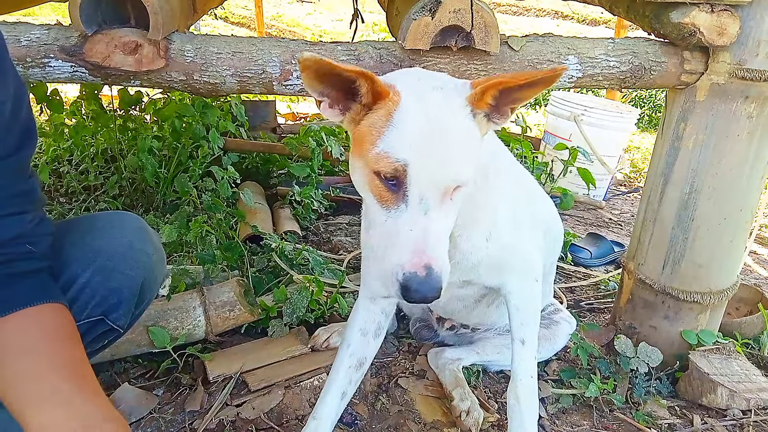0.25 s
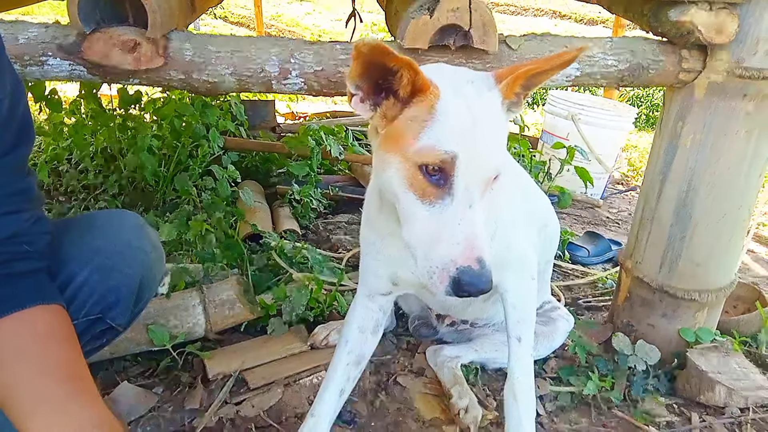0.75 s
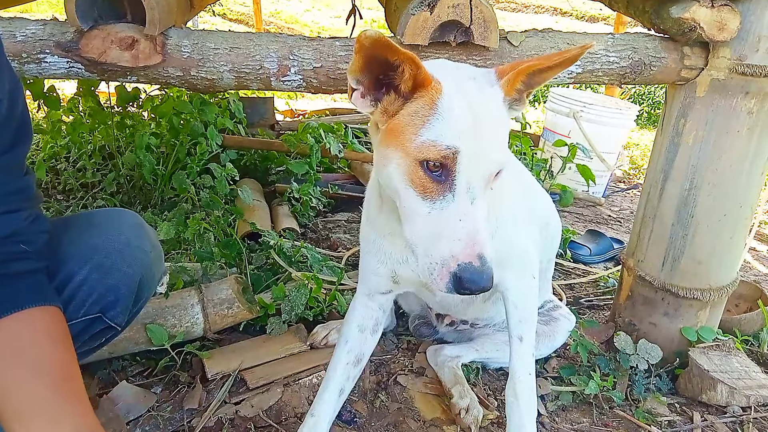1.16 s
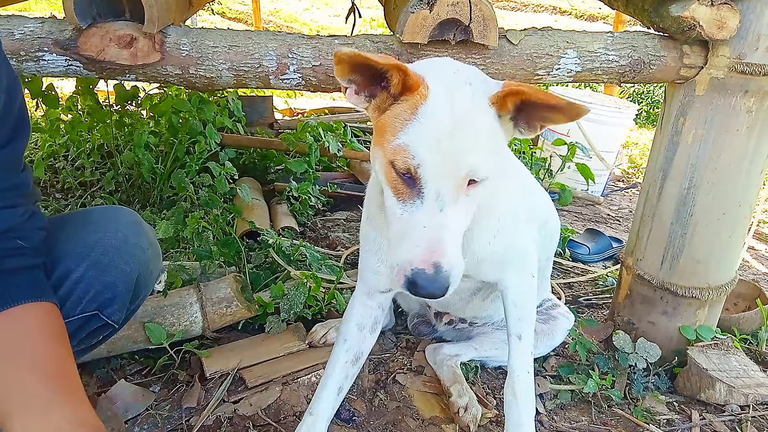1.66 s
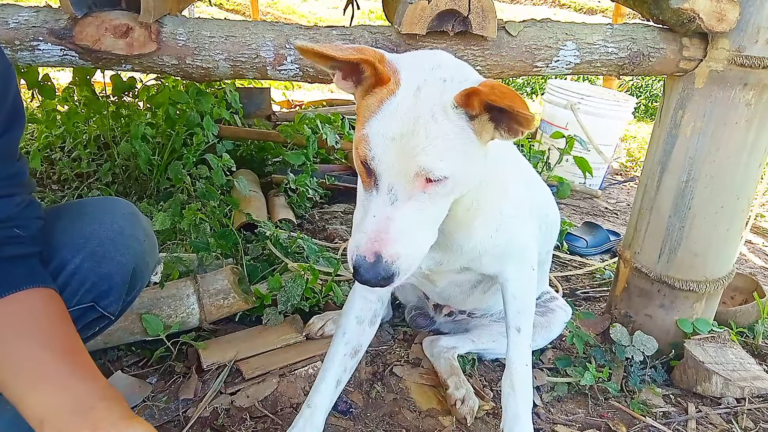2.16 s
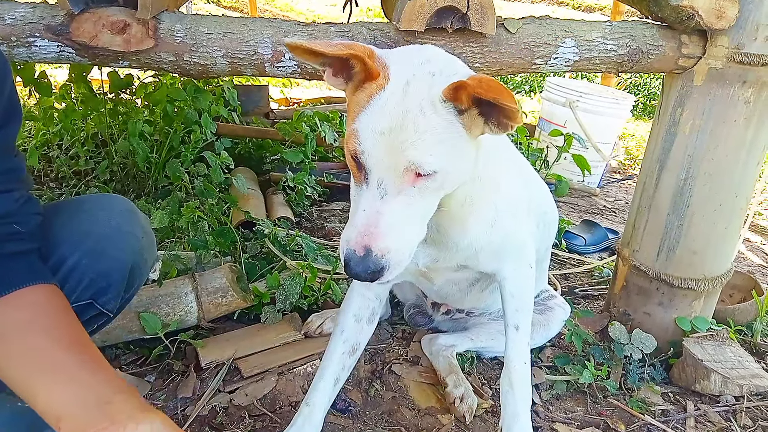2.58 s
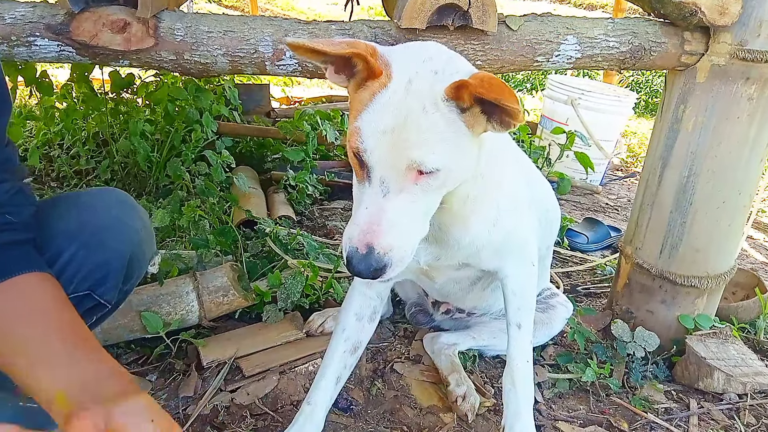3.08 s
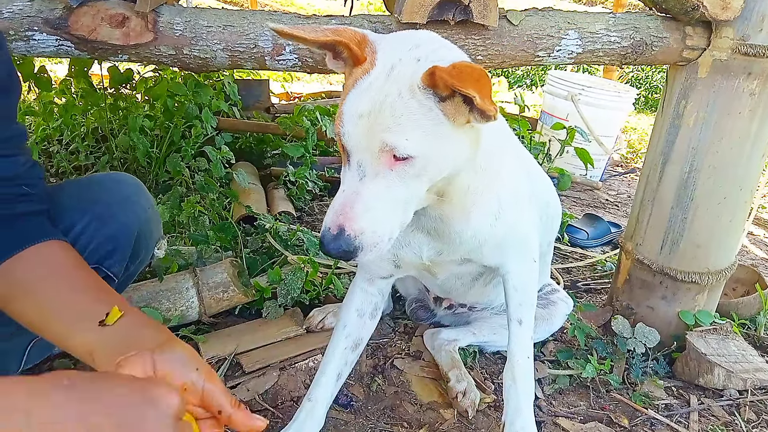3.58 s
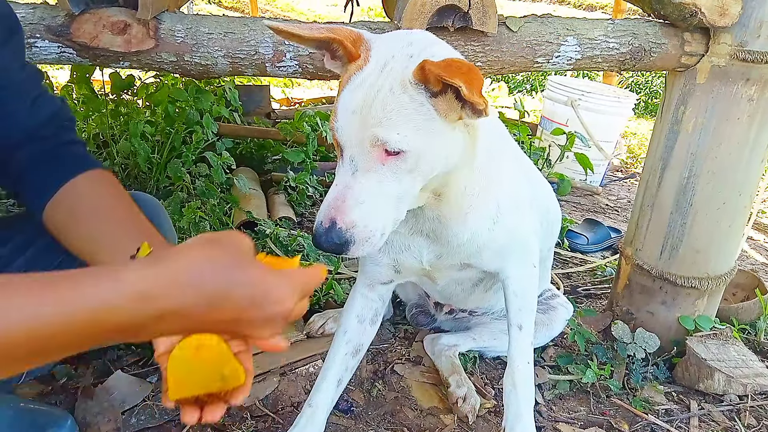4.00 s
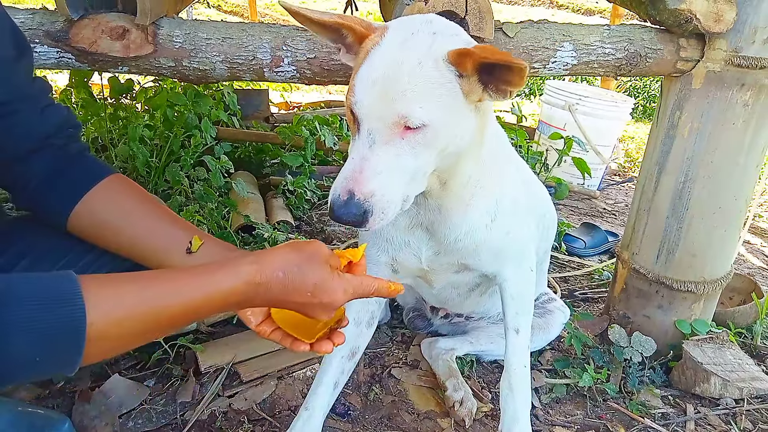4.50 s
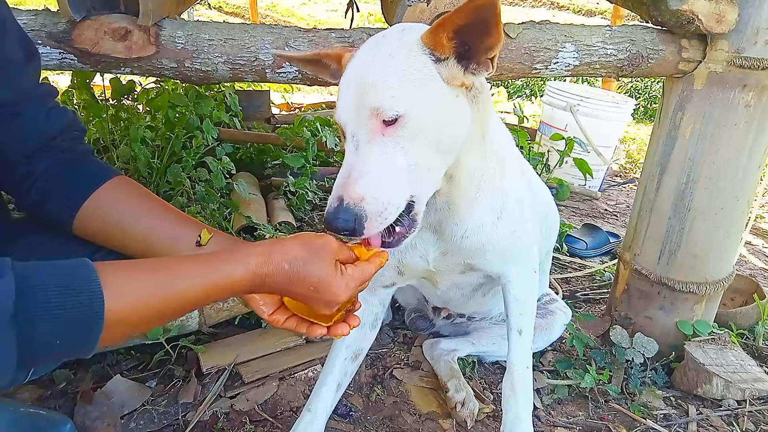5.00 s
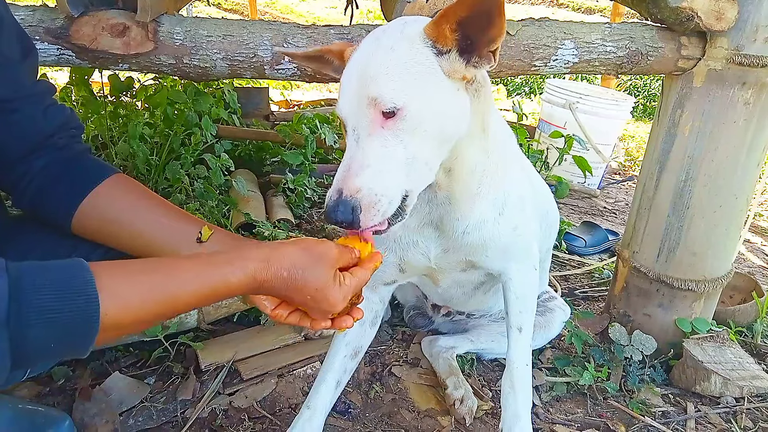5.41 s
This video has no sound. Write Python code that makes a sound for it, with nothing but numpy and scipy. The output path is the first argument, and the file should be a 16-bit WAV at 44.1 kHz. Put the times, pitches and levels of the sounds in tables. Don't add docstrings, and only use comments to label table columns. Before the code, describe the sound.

In a quiet outdoor yard, a dog close to a small handheld microphone makes faint wet lip pops. A small bird pipes three thin rising notes, then fruit beside the microphone is cut with a sharp knock, a loud crisp snap and short grainy tears. Sparse licks follow and a brief high twitter near the end, over insects, far fowl and airy leaf hiss.

```python
import sys
import numpy as np
from scipy import signal
from scipy.fft import rfft, irfft
from scipy.io import wavfile
from scipy.ndimage import uniform_filter1d

SR = 44100
rng = np.random.default_rng(int(sys.argv[2]) if len(sys.argv) > 2 else 0)


def volts_from_decibels(level):
    exponent = np.asarray(level, float) / 20
    return 10 ** exponent


def digitize_waveform(pressure):
    field = np.atleast_2d(pressure).T
    bounded = np.clip(field, -1, 1)
    quanta = np.round(bounded * 32767).astype(np.int16)
    wavfile.write(sys.argv[1], SR, quanta)


N = 249165
TIME = np.arange(N) / SR
FREQ = np.maximum(np.fft.rfftfreq(N, 1 / SR), 1)

# (time [s], peak level [dB], cavity pitch [Hz], ring t60 [s], release click level [dB])
MOUTH_POPS = [(0.833, -52.5, 4840, 0.077, -5), (1.054, -56, 1990, 0.051, -7),
              (1.144, -51, 2950, 0.089, -12), (1.1675, -43.5, 1950, 0.025, 1),
              (1.289, -56, 4360, 0.035, -10), (1.798, -47.5, 1200, 0.03, -9), (1.824, -52, 3870, 0.039, 0),
              (1.873, -47, 737, 0.11, -15), (1.884, -45, 656, 0.088, -2), (2.246, -44.5, 695, 0.047, -15),
              (2.376, -35, 824, 0.009, -24), (3.686, -48.5, 4260, 0.023, -1),
              (4.6905, -37.5, 754, 0.046, -26), (4.79, -49, 3800, 0.033, -17),
              (5.611, -41, 1010, 0.023, -18),
              (0.839, -55, 4300, .04, -6), (1.283, -59, 2560, 0.09, -20), (1.36, -57, 2400, .06, -20),
                (1.205, -59, 2350, 0.09, -20), (1.13, -59, 3000, .05, -20), (1.75, -58, 470, 0.05, -8),
                (1.8, -54, 740, 0.048, -10), (1.69, -51, 670, 0.039, -21), (1.85, -52, 390, 0.039, -16),
                (1.798, -52, 1770, 0.03, -13), (1.799, -51, 3360, .02, -6), (1.874, -48.5, 2930, 0.053, -8),
                (1.875, -49, 3600, 0.034, -6), (2.385, -49, 880, 0.05, -14), (5.235, -57, 763, 0.059, -12),
                (5.612, -51, 250, 0.075, -6)]
# (time [s], peak level [dB], lower edge [Hz], t60 [s])
THIN_TICKS = [(1.1685, -49, 700, .012), (1.1833, -48, 1200, 0.027), (1.799, -52, 900, .012),
              (1.873, -53, 2500, 0.027), (2.4114, -48, 7050, .01), (2.6307, -24, 3000, 0.0025),
              (2.866, -31, 11000, .006), (2.9857, -30, 3000, 0.015), (2.9268, -37, 11000, .009),
              (2.969, -40.5, 7900, .005), (3.057, -54, 11200, .012), (3.1188, -54, 9000, .012),
              (3.6845, -51, 4000, 0.011), (4.0637, -48, 8000, 0.03), (4.1116, -48, 6900, 0.0087),
              (4.5465, -50, 7000, 0.012), (4.654, -55, 2480, .012), (4.7355, -50, 9100, .01),
              (4.7655, -58, 10000, .01), (5.1617, -53, 8000, 0.0093), (5.26, -54, 4960, .01)]

# (time [s], strength [dB], signed push [ratio])
BLADE_SLIPS = [
    (2.8128, 1.5, 0.98),
    (2.8132, 0, -0.72),
    (2.8140, 1.3, 0.91),
    (2.8155, -17.5, -1.2),
    (2.8163, -1.5, 0.85),
    (2.8177, -20, -0.61),
    (2.9853, -22, 0.8),
    (2.9868, -35, -1.4),
]
# (pitch [Hz], level [dB], t60 [s])
BLADE_MODES = [(938, -20.5, 0.01), (1334, -15.5, 0.02), (1800, -13, 0.01), (2263, -7, 0.024),
               (2256, -23.5, 0.095), (2510, -32, 0.1), (3000, -10, 0.012), (3610, -5.5, 0.025),
               (4650, 0.5, 0.0074), (5170, -5.5, 0.0088), (6700, -6, 0.0022), (8800, -10, 0.0054),
               (11300, -13.5, 0.013), (12250, -10, 0.0038), (15000, -13, 0.012)]
# (frequency [Hz], density [dB per Hz])
FIBRE_COLOUR = [(180, -42), (600, -11), (1560, -1.5), (2250, -8), (2740, -1), (5700, -2.5), (7080, -10),
                (8940, -1.5), (10600, -15), (13300, -12), (16000, -19.5)]
# (time of peak [s], rms level [dB], rise [s], fall t60 [s], bright share [ratio])
FIBRE_TEARS = [(1.877, -58, 0.03, 0.15, -3.3), (2.8141, -31.5, 0.00049, 0.021, 1.5),
               (2.826, -39.5, 0.0091, 0.096, 0.3), (2.893, -48, 0.003, 0.092, 0.6),
               (2.901, -40.5, 0.012, 0.037, 0.97), (2.914, -58.5, 0.0065, 0.11, 2.5),
               (2.95, -66, 0.046, 0.52, 2.5), (2.9862, -32.5, 0.00078, 0.035, -0.35),
               (3.003, -51, 0.0067, 0.077, 0), (3.02, -70, .01, 0.27, 2), (3.129, -74, 0.02, 0.23, 4.5)]
# (time [s], peak level [dB], pitch [Hz], t60 [s])
FRUIT_KNOCKS = [(2.3785, -46.5, 193, 0.037), (2.574, -39, 194, 0.027), (2.6309, -31, 1800, 0.0082),
                (2.6317, -17.5, 1140, 0.0053), (2.632, -31, 336, 0.027), (2.634, -42, 840, 0.017),
                (2.633, -42, 136, 0.075), (2.899, -44, 900, .05), (2.91, -52, 950, .04),
                (2.9, -50, 200, .06), (2.985, -43, 1700, .025), (2.987, -52, 150, .08),
                (5.59, -57.5, 743, 0.36)]
# (time [s], peak level [dB],
# pitch [Hz], t60 [s])
TINY_CRACKS = [(2.6306, -14.5, 4840, 0.0011), (2.631, -19.5, 8670, 0.002), (2.6306, -32, 13000, 0.0027),
               (2.8257, -27, 4800, .008), (2.8282, -37, 2000, .01), (2.8315, -35, 2000, .01),
               (2.835, -40, 2250, 0.021), (2.851, -42, 2100, .012), (2.853, -45, 2000, .01),
               (3.0575, -48, 14300, .005), (2.928, -46, 13000, .008), (3.132, -48, 8640, .015),
               (3.1195, -49, 13000, .005), (2.861, -48, 12000, .005), (2.883, -32, 13500, .005),
               (2.892, -40, 2900, 0.011), (2.894, -38, 4600, .006), (2.8968, -28.5, 2760, 0.0056),
               (2.8987, -26, 12800, .004), (2.901, -29, 5450, 0.0058), (2.9016, -33, 4660, .007),
               (2.902, -26.5, 3690, 0.0095), (2.9113, -42, 3700, 0.0047), (2.916, -43, 8850, 0.0053),
               (2.953, -50, 13500, .005), (2.983, -43, 3900, 0.01), (2.9847, -31, 12100, .007),
               (2.9851, -26, 4120, 0.0068), (2.9862, -33.5, 3860, 0.015), (2.986, -31, 5560, 0.012),
               (3.0005, -45, 5300, .01), (3.035, -52, 12000, .005), (3.046, -49, 13500, .006),
               (3.081, -56, 13000, .005), (3.127, -49, 10500, .006), (1.1688, -47, 3580, .008),
               (1.8744, -48, 3300, .02), (1.8775, -51, 3480, .015), (1.1692, -50, 5200, .005),
               (1.1847, -48, 3000, .006), (1.1846, -48, 5600, .006), (2.6305, -34, 3170, 0.0038),
               (4.6535, -49, 3400, .005), (4.654, -46, 5700, 0.0056), (4.7535, -48, 6500, .006),
               (4.754, -54, 4300, .008), (4.754, -50, 8400, .006), (.836, -58, 3570, 0.009)]

# (time [s], length [s], start pitch [Hz], level [dB], climb time [s])
PIPED_NOTES = [
    (2.212, 0.155, 7450, -55.5, 0.029),
    (2.455, 0.18, 6900, -53.5, 0.042),
    (2.735, 0.155, 7850, -55, 0.055),
]
# (time [s], length [s], start pitch [Hz], end pitch [Hz], level [dB])
TWITTER_NOTES = [(0.64, 0.035, 8750, 8600, -60), (.675, .03, 8000, 7750, -63),
                 (0.688, 0.03, 8650, 8600, -58), (.71, .025, 7650, 7450, -63), (.74, 0.04, 8750, 7700, -60),
                 (.765, .02, 8750, 8650, -60), (5.398, 0.025, 8800, 8500, -59),
                 (5.42, .06, 8300, 7550, -64), (5.44, .03, 8500, 8300, -65), (5.5, 0.03, 8450, 8000, -62),
                 (5.53, 0.035, 7900, 8200, -62), (5.565, .03, 8000, 7950, -64)]
PIPE_WOBBLE, TREMBLE_DB = .007, 3.4

# (time [s], length [s], start pitch [Hz], glide [Hz], level [dB])
FOWL_WHISTLES = [(1.86, 0.08, 1473, 34, -72), (2.02, 0.035, 1720, -20, -71), (2.05, 0.045, 2950, -20, -74),
                 (2.09, 0.029, 2980, -10, -74), (2.035, 0.023, 1880, 10, -78), (2.07, 0.045, 1890, 18, -70),
                 (2.13, 0.034, 1900, 0, -75), (2.085, 0.033, 1696, -16, -73), (2.95, 0.053, 1500, 18, -70),
                 (2.185, 0.04, 1530, 40, -70), (2.215, 0.036, 1605, 40, -72), (2.3, 0.08, 1727, 60, -76),
                 (2.41, 0.077, 1850, -65, -68.5), (2.54, 0.068, 1580, -18, -66),
                 (3.33, 0.17, 1500, -55, -76.5), (3.583, 0.17, 1745, 21, -78), (3.72, 0.16, 1622, 19, -79),
                 (3.861, 0.15, 1640, -80, -78), (3.85, 0.15, 1403, -135, -79),
                 (3.92, 0.093, 1950, -60, -84), (4.44, 0.03, 1620, 50, -72), (4.455, .035, 1900, 100, -73),
                 (4.474, .06, 1780, 100, -77), (.27, 0.054, 1990, -20, -76), (.79, .05, 2250, 60, -80),
                 (4.64, 0.058, 2170, 22, -73), (4.605, 0.049, 1750, 170, -62), (4.65, 0.043, 1890, 40, -64),
                 (4.7, 0.016, 1750, 0, -68), (4.905, .045, 1850, -84, -71),
                 (4.748, 0.025, 1790, -32, -69.5), (4.845, 0.043, 1780, 40, -65.5),
                 (4.962, 0.033, 1800, -6, -64), (4.992, 0.024, 1770, -10, -63.5),
                 (5.02, 0.035, 1790, 0, -69), (5.459, 0.048, 2000, -4, -71)]
# (time [s], length [s], pitch [Hz], level [dB])
DOVE_COOS = [(0.299, 0.54, 1885, -81.5), (0.399, 0.13, 781, -79), (3.35, 0.11, 792, -79),
             (0.614, 0.14, 785, -78), (0.618, 0.16, 938, -74.5), (1.33, 0.14, 823, -69.5),
             (1.74, 0.061, 1463, -71), (1.81, .05, 1480, -77), (2.052, 0.18, 945, -82),
             (2.274, 0.05, 958, -71.5), (2.332, 0.056, 970, -73), (2.393, 0.056, 945, -73),
             (2.064, 0.032, 964, -75), (3.032, 0.088, 1730, -72.5), (3.28, 0.033, 960, -70.5),
             (3.35, 0.066, 950, -71), (3.767, 0.056, 788, -71.5), (3.839, 0.056, 790, -67),
             (3.985, 0.035, 763, -73.5), (4.17, 0.029, 696, -71), (3.862, 0.082, 275.5, -76),
             (0.028, 0.15, 960, -79), (0.301, .09, 965, -77), (.97, .07, 795, -79), (4.31, 0.17, 955, -69),
             (4.799, 0.04, 968, -73), (4.871, 0.027, 973, -74), (4.642, .04, 938, -69.5),
             (4.73, 0.02, 950, -75), (4.701, 0.027, 757, -65.5), (5.473, 0.12, 680, -74.5)]
# (pitch [Hz], width [octaves], level [dB])
FAR_CHORUS = [(799, 0.024, -83.5), (945, 0.052, -84.5), (1500, 0.085, -86), (1800, 0.074, -82)]

# (time of peak [s], level [dB], spread [s])
INSECT_SURGES = [
    (0.0, -73, 0.04),
    (.21, -71.5, 0.036),
    (.72, -78, 0.047),
    (1.87, -85, 0.035),
    (3.95, -78.5, 0.12),
    (4.66, -72, 0.074),
    (4.93, -77, 0.027),
    (5.53, -70, 0.063),
]
# (time of peak [s], level [dB], spread [s])
RUSTLES = [(.02, -75, .04), (.27, -75, 0.027), (.57, -83, .02), (.87, -80, .04), (1.07, -73, 0.027),
           (1.185, -81, .025), (1.88, -69, 0.024), (2.0, -78, 0.03), (2.1, -74, 0.027), (2.43, -73, 0.068),
           (3.045, -81, .012), (3.132, -67, 0.011), (3.67, -77, 0.022), (3.93, -72, 0.067),
           (4.07, -87, .015), (4.115, -67, 0.014), (4.55, -77, 0.071), (4.74, -73, 0.035),
           (5.07, -77, .025), (5.165, -76, .015), (5.5, -72, 0.033), (5.6, -74, .025)]
# (time of peak [s], level [dB], spread [s])
WEIGHT_SHIFTS = [(.7, -86, 0.13), (1.3, -66.5, 0.028), (1.95, -73, 0.14), (2.39, -62, 0.066),
                 (2.56, -66, 0.054), (2.7, -68, 0.16), (2.98, -63, 0.071), (3.1, -79, 0.167),
                 (3.57, -74, 0.05), (3.9, -68.5, 0.11), (4.44, -71, 0.039), (4.67, -74, 0.05),
                 (4.76, -70, 0.05), (5.01, -73, 0.036), (5.63, -71, 0.19)]

# (frequency [Hz], density [dB per Hz])
YARD_AIR = [(15, -70), (25, -55), (53, -3.5), (75, 1), (184, -6.5), (276, -4), (314, -7), (642, -8),
            (785, -6), (1220, -9.5), (1460, -10), (2000, -10), (2600, -18.5), (4400, -120)]
# (frequency [Hz], density [dB per Hz])
LEAF_HISS = [(2000, -12), (2600, -13), (3300, -9), (4300, -7.5), (5500, -9.5), (6600, -10.5), (7500, -10.5),
             (9500, -9), (10200, -15), (11000, -19.5), (11600, -23.5), (13000, -22), (15500, -25.5)]
# (time of peak [s], lift [dB], spread [s])
BREEZE_GUSTS = [
    (1.1, 4.5, 0.13),
    (1.85, 4, 0.033),
    (2.35, 3.5, 0.16),
    (2.95, 5, 0.23),
    (3.8, 2.5, 0.4),
    (4.8, 4, 0.23),
    (5.65, 3, 0.18),
]
# (time of peak [s], lift [dB], spread [s])
LEAF_STIRS = [
    (.15, 0, 0.11),
    (.6, 0.5, 0.092),
    (2.1, -1.5, 0.2),
    (2.48, 3.5, 0.108),
    (3.3, 0, 0.13),
    (3.93, 4, 0.052),
    (4.3, -2.5, 0.115),
    (5.25, -2, 0.16),
]


def dog_mouth():
    out = np.zeros(N)
    pops = MOUTH_POPS
    for s, db, hz, t60, click_db in pops:
        cavity = ring(hz, t60, push=0.02 * t60, glide=0.024)
        noise = uniform_filter1d(rng.standard_normal(900), size=6)
        add(out, s, volts_from_decibels(db - 3.5) * cavity)
        add(out, s, volts_from_decibels(db + click_db) * click(noise, 0.38 * hz, t60))
    for s, db, low_hz, t60 in THIN_TICKS:
        noise = uniform_filter1d(rng.standard_normal(900), size=2)
        add(out, s, volts_from_decibels(db) * click(noise, low_hz, t60))
    return out


def knife_in_fruit():
    out = np.zeros(N)
    blade = np.zeros(SR // 4)
    for k, (hz, db, t60) in enumerate(BLADE_MODES):
        mode = (-1) ** k * volts_from_decibels(db) * ring(hz, t60, push=.00005)
        blade[:len(mode)] += mode
    for s, db, sign in BLADE_SLIPS:
        add(out, s, sign * volts_from_decibels(db - 12.0) * blade)

    grains = rfft(rng.standard_normal(N) * volts_from_decibels(2.5 * walk(900))) * volts_from_decibels(shape_db(FIBRE_COLOUR))
    dull = unit(irfft(grains, N))
    bright = unit(irfft(grains * FREQ, N))
    for k, (s, db, rise, t60, share) in enumerate(FIBRE_TEARS):
        fibre = np.roll(dull + np.clip(share, -.5, 9) * bright, 9000 * k)
        growing = np.exp(np.minimum(TIME - s, 0) * 2 / rise)
        dying = 1000 ** (-np.maximum(TIME - s, 0) / t60)
        out += volts_from_decibels(db) * fibre * np.where(TIME < s, growing, dying)

    for s, db, hz, t60 in FRUIT_KNOCKS:
        add(out, s, volts_from_decibels(db) * ring(hz, t60, push=0.00066, glide=-0.024))
    for s, db, hz, t60 in TINY_CRACKS:
        add(out, s, volts_from_decibels(db) * ring(hz, t60, push=0.00015, glide=-0.032))
    return out


def small_birds():
    out, tremble, wobble = np.zeros(N), walk(300), walk(400)
    attack_s, release_s, fade_db_s = .03, .03, 26
    for s, length, hz, db, climb in PIPED_NOTES:
        since = np.maximum(TIME - s, 0)
        edge = np.clip(np.minimum((TIME - s) / attack_s, (s + length - TIME) / release_s), 0, 1)
        top_hz = 8800 + 5500 * climb
        pitch = top_hz - (top_hz - hz) * np.exp(-since / climb)
        level = volts_from_decibels(db - fade_db_s * since + TREMBLE_DB * tremble)
        out += edge * level * tone(pitch * (1 + PIPE_WOBBLE * wobble))
    for s, length, hz0, hz1, db in TWITTER_NOTES:
        i, n = int(s * SR), int(length * SR)
        pitch = np.linspace(hz0, hz1, n) * (1 + 2 * PIPE_WOBBLE * wobble[i:i + n])
        level = volts_from_decibels(db + TREMBLE_DB * tremble[i:i + n])
        add(out, s, level * np.hanning(n) * tone(pitch))
    return echoes(out, t60=.32, wet_db=3.5)


def far_fowl():
    out, waver, flutter, rasp = np.zeros(N), walk(40), walk(60), walk(350)
    coos = [(s, length, hz, -0.0089 * hz, db) for s, length, hz, db in DOVE_COOS]
    for s, length, hz0, glide, db in FOWL_WHISTLES + coos:
        i, n = int(s * SR), int(length * SR)
        pitch = np.linspace(hz0, hz0 + glide, n) * (1 + .011 * waver[i:i + n])
        hoarse = .5 if hz0 > 1200 else .35
        level = volts_from_decibels(db + 5.5 + 1.5 * flutter[i:i + n]) * (1 + hoarse * rasp[i:i + n])
        add(out, s, level * np.sqrt(np.hanning(n)) * tone(pitch))
    chorus = np.zeros(N)
    for hz, width, db in FAR_CHORUS:
        level = volts_from_decibels(db + 0.85 * walk(8.4) + breeze_db())
        chorus += level * unit(bell(rng.standard_normal(N), hz, width))
    return echoes(out, t60=.3, wet_db=-8) + chorus


def insects():
    high = unit(bell(rng.standard_normal(N) * volts_from_decibels(1.6 * walk(150)), 8710, 0.075))
    low = unit(bell(rng.standard_normal(N) * volts_from_decibels(1.8 * walk(150)), 7630, 0.081))
    both = high + volts_from_decibels(-5.5) * low * volts_from_decibels(0.37 * walk(3.63))
    return swells(INSECT_SURGES, rest_db=-70) * both


def rustle():
    strength = volts_from_decibels(1.3 * rng.exponential(size=N))
    grains = rng.standard_normal(N) * strength * (rng.random(N) < .3)
    return swells(RUSTLES, rest_db=-101) * volts_from_decibels(-2.5) * unit(bell(grains, 13000, 0.4))


def shuffle():
    rumble = unit(bell(rng.standard_normal(N), 107, 0.95))
    return swells(WEIGHT_SHIFTS, rest_db=-83) * volts_from_decibels(-4.5) * rumble


def yard():
    colour = YARD_AIR[:-2] + LEAF_HISS[1:]
    noise = rfft(rng.standard_normal(N)) * volts_from_decibels(shape_db(colour))
    out, swell = np.zeros(N), walk(1.0)
    stir_db = sum(db * hump(s, spread) for s, db, spread in LEAF_STIRS)
    for k in range(10):
        share = np.maximum(0, 1 - abs(np.log2(FREQ / 31.25) - k))
        drift_db = .4 * swell + .7 * walk(3) + .9 * walk(14)
        if k == 6:
            drift_db = drift_db + breeze_db()
        if k == 7:
            drift_db = drift_db + stir_db
        out += irfft(noise * share, N) * volts_from_decibels(drift_db)
    return unit(out) * volts_from_decibels(-63.5)


def breeze_db():
    lift = sum(db * hump(s, spread) for s, db, spread in BREEZE_GUSTS)
    return lift - np.median(lift)


def echoes(x, t60, wet_db):
    t = TIME[:int(t60 * SR)]
    tail = rng.standard_normal(len(t)) * 1000 ** (-t / t60)
    tail = tail / np.sqrt(np.sum(tail ** 2))
    return x + volts_from_decibels(wet_db) * signal.fftconvolve(x, tail)[:N]


def ring(hz, t60, push=.0002, glide=0.):
    t = TIME[:int(t60 * SR) + 64]
    envelope = (1 - np.exp(-t / push)) * 1000 ** (-t / t60)
    return envelope * np.sin(2 * np.pi * hz * t * (1 + glide * t / t60))


def click(noise, low_hz, t60):
    edge = signal.butter(3, min(low_hz, 15000), "high", fs=SR, output="sos")
    return signal.sosfilt(edge, noise * 1000 ** (-TIME[:len(noise)] / t60))


def tone(pitch):
    return np.sin(2 * np.pi * np.cumsum(pitch) / SR)


def bell(x, hz, octaves):
    return irfft(rfft(x) * np.exp(-.5 * (np.log2(FREQ / hz) / octaves) ** 2), N)


def shape_db(table):
    hz, db = np.transpose(table)
    return np.interp(np.log(FREQ), np.log(hz), db)


def walk(rate):
    k = int(SR / rate)
    held = np.repeat(rng.standard_normal(N // k + 1), k)
    return 1.04 * uniform_filter1d(uniform_filter1d(held, k), k)[:N]


def hump(s, spread):
    return np.exp(-.5 * ((TIME - s) / spread) ** 2)


def swells(table, rest_db):
    return volts_from_decibels(rest_db) + sum(volts_from_decibels(db) * hump(s, spread) for s, db, spread in table)


def unit(x):
    return x / np.sqrt(np.mean(x ** 2))


def add(out, s, sound):
    i = int(s * SR)
    out[i:i + len(sound)] += sound[:N - i]


def scene():
    near = echoes(dog_mouth() + knife_in_fruit(), t60=.2, wet_db=-30)
    far = small_birds() + far_fowl() + insects() + rustle() + shuffle() + yard()
    below = np.clip((15850 - FREQ) / 350, 0, 1) ** 2
    above = (1 - below) * np.clip((16800 - FREQ) / 600, 0, 1)
    body = irfft(rfft(near + far) * below, N)
    very_top = irfft(rfft(near) * above, N)
    crack = sum(hump(s, spread=.0012) for s in (2.6306, 2.8135, 2.9855))
    return (body + volts_from_decibels(-12) * crack * very_top)[None]


def roll_off(x):
    return signal.sosfilt(signal.butter(12, 16800, fs=SR, output="sos"), x)


def record(dry):
    bass_cut = signal.butter(4, 55, "high", fs=SR, output="sos")
    thin = signal.sosfilt(bass_cut, dry)
    return roll_off(thin)


dry = scene()
out = record(dry)
digitize_waveform(out)
```